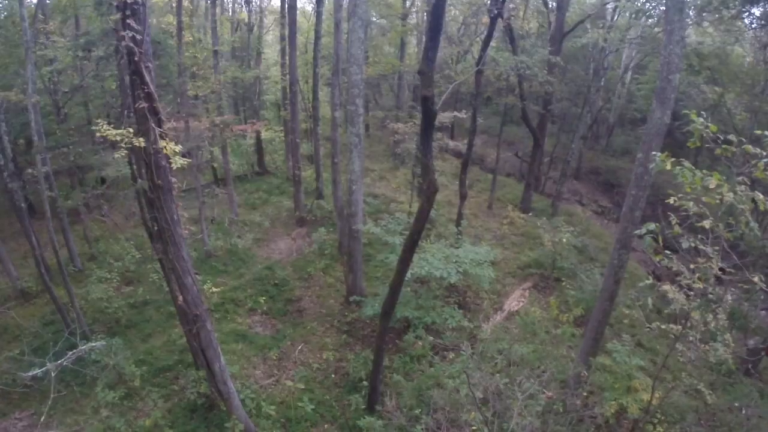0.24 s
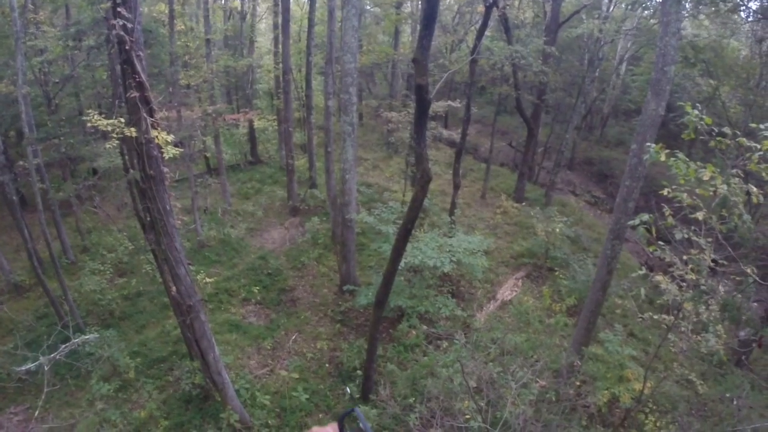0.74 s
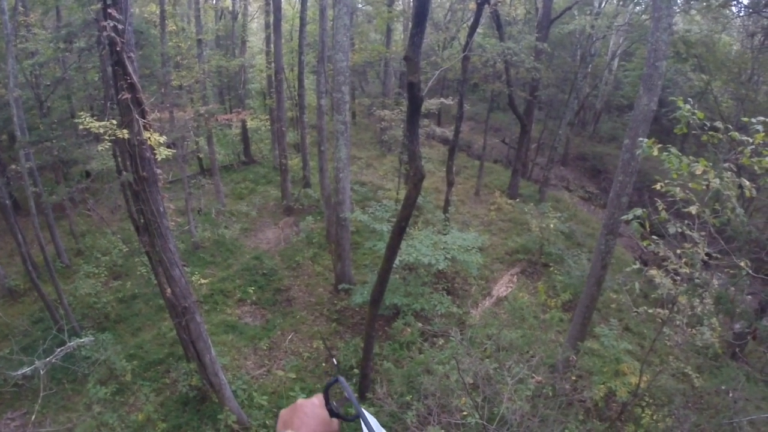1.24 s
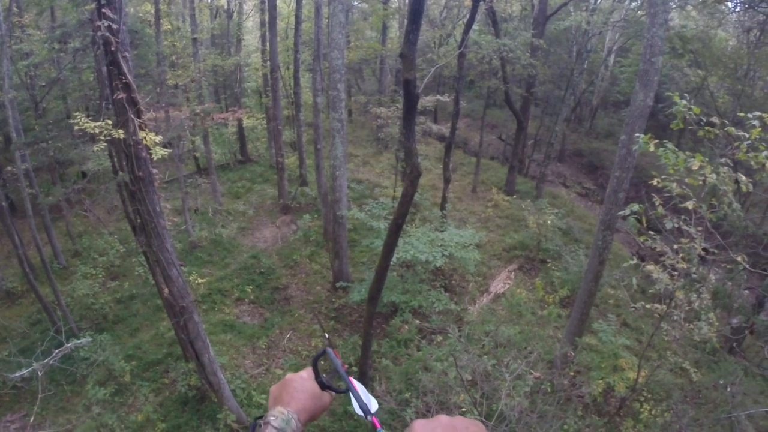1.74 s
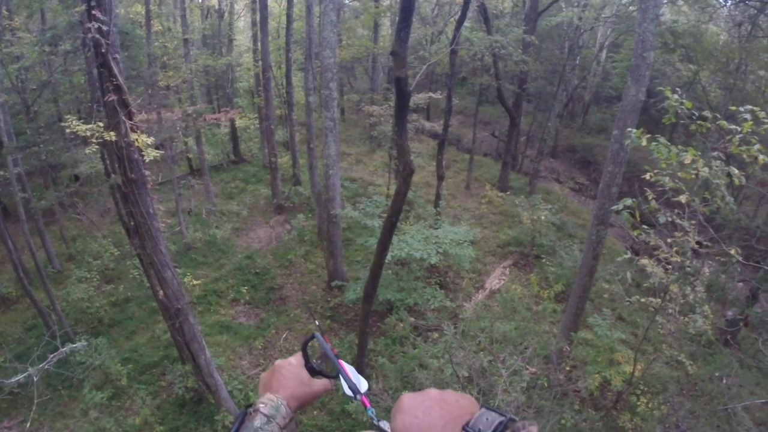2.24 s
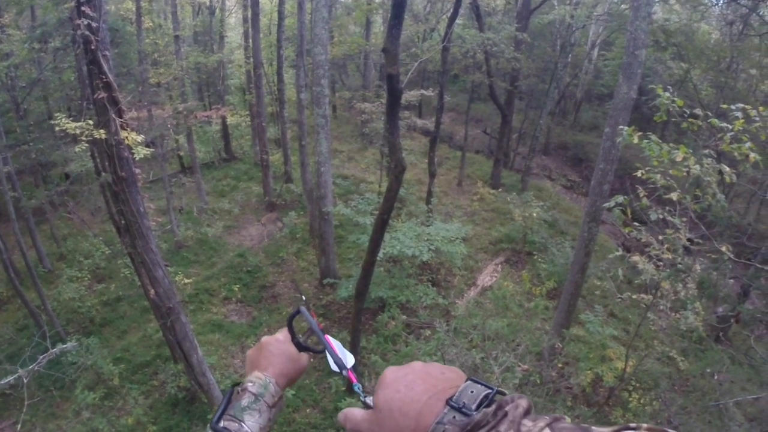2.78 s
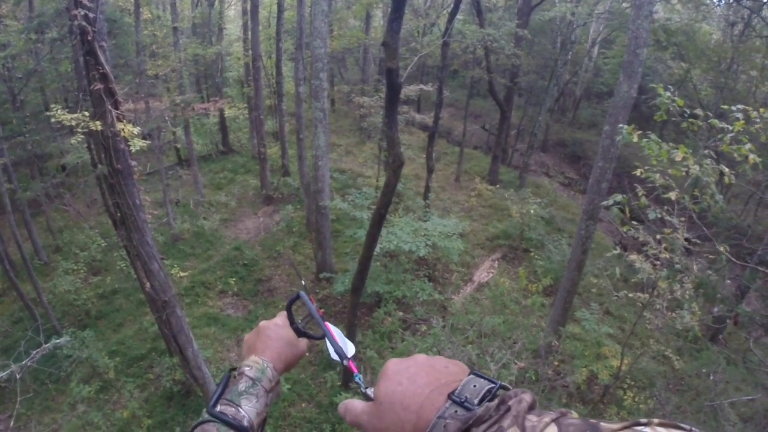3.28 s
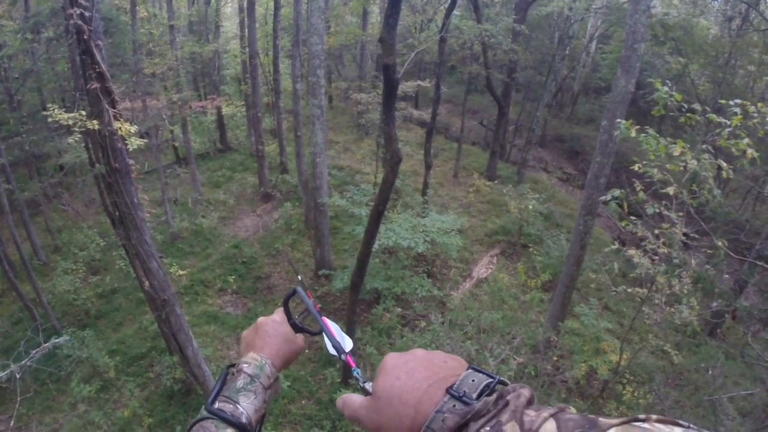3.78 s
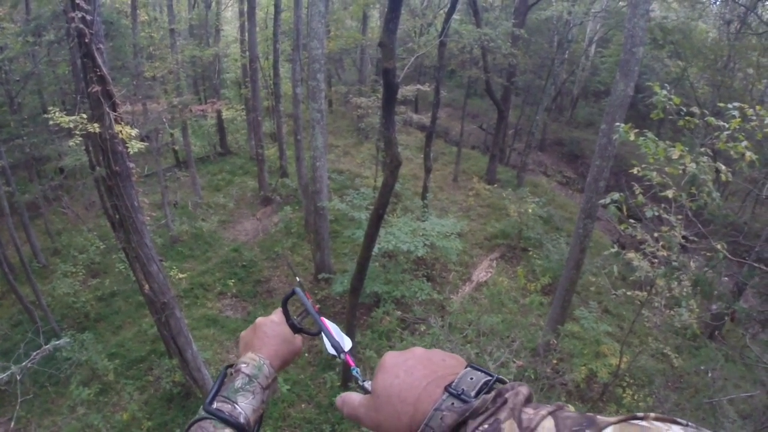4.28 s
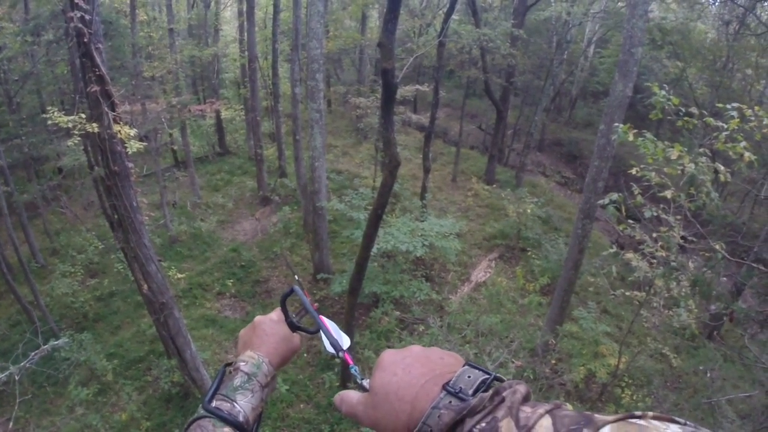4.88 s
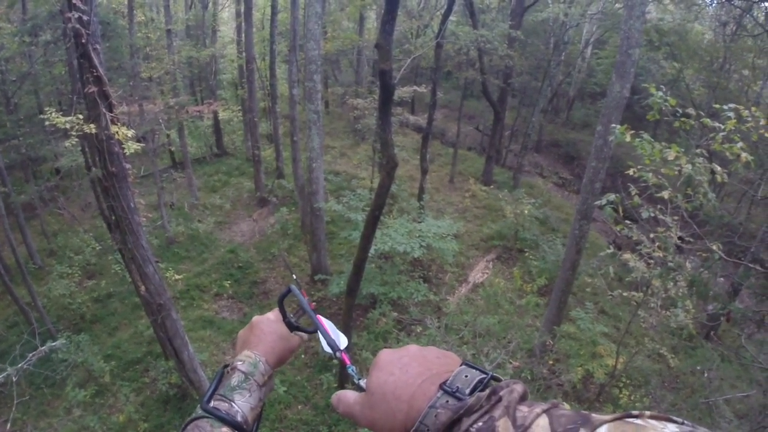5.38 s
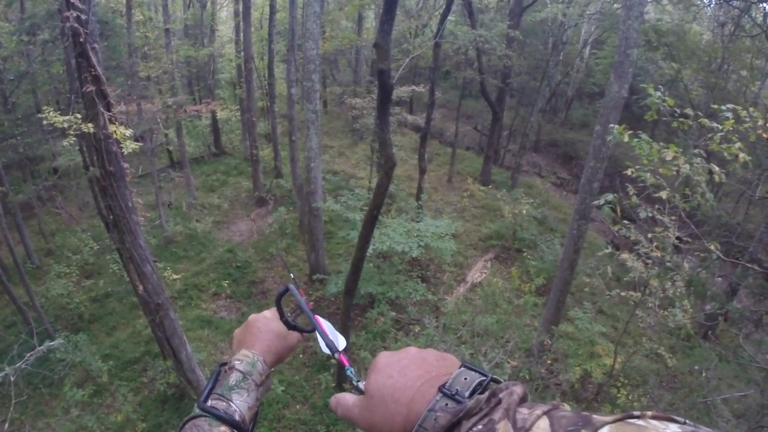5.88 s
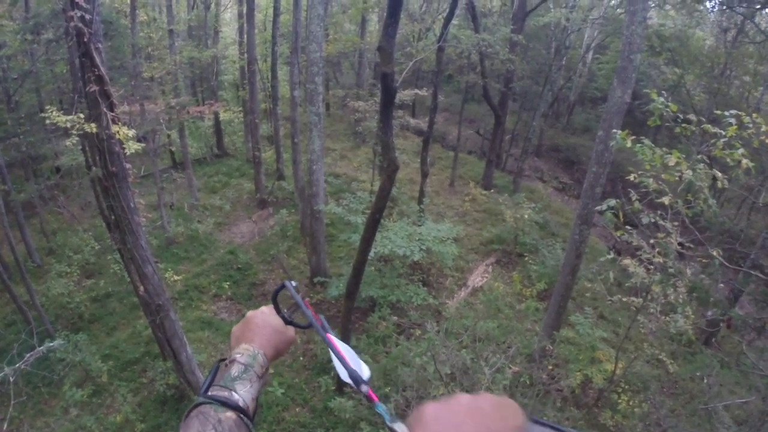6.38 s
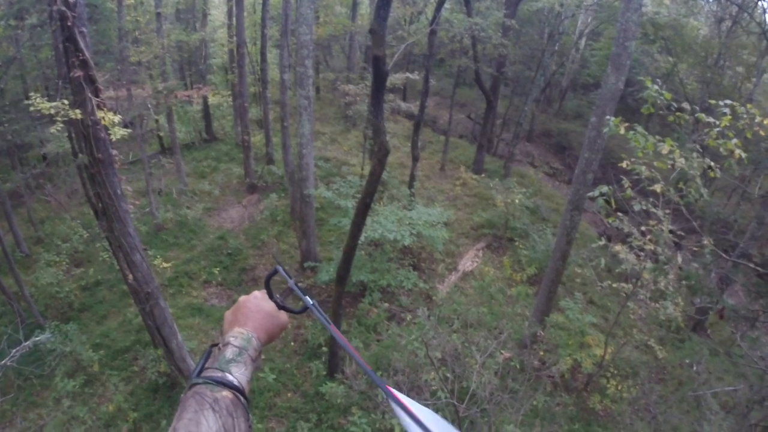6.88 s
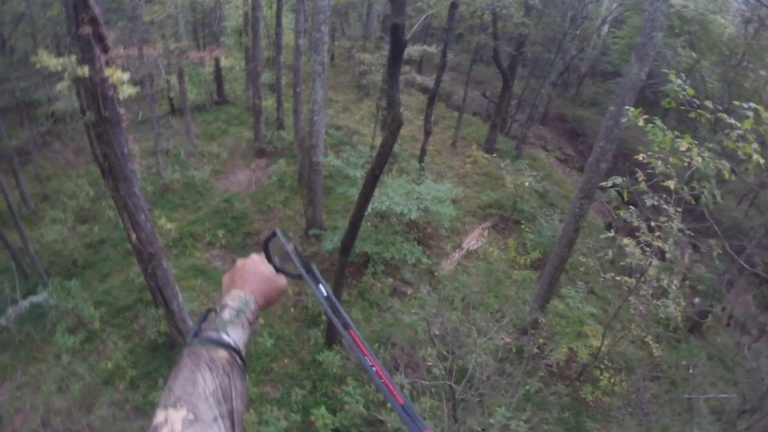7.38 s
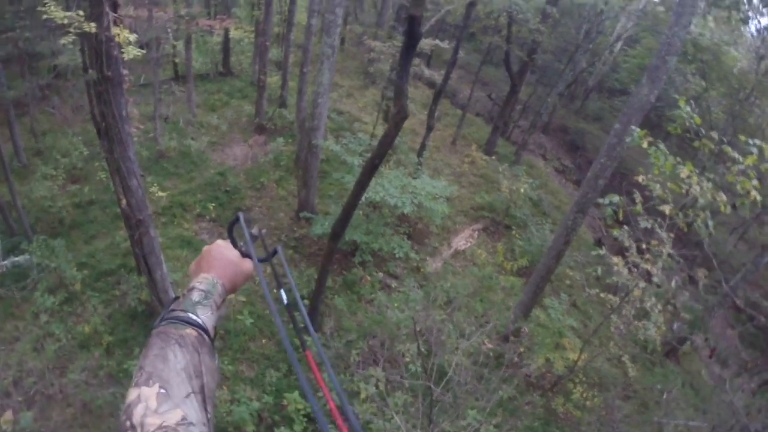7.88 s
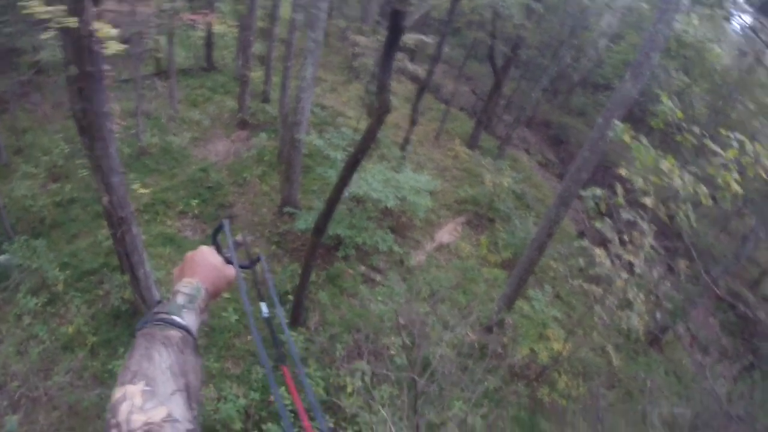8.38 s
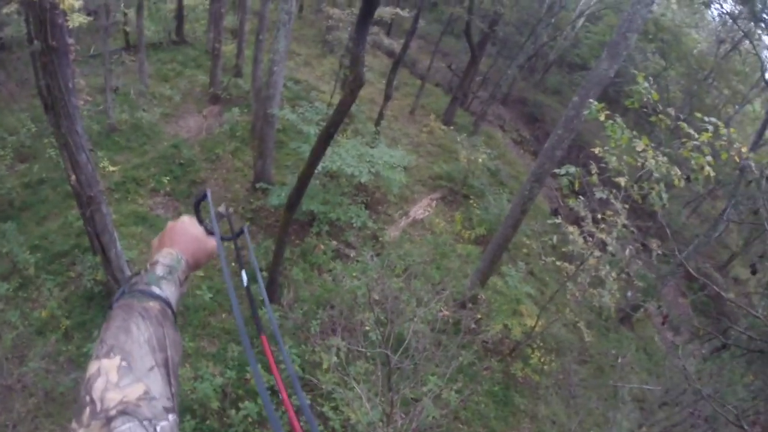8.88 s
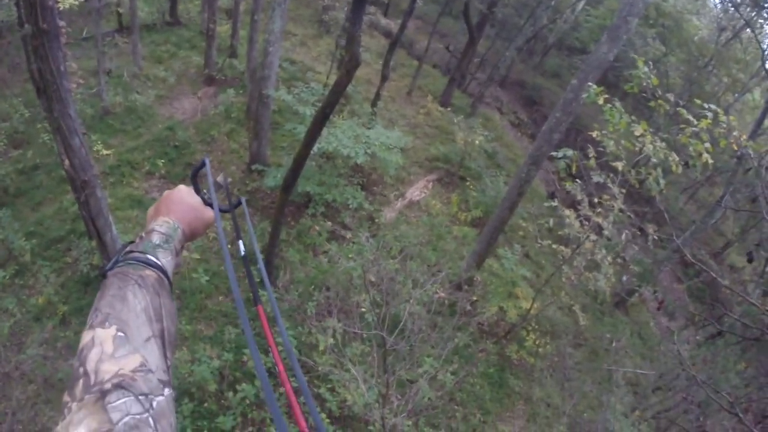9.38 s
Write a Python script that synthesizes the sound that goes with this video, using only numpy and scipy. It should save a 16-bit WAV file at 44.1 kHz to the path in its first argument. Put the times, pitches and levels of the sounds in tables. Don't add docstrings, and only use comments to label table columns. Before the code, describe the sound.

A wide stereo insect chorus, bright and dense, with soft air and a fluttering low hum, lasts only a quarter second. It switches to a much quieter single-channel, head-worn microphone in the woods: dark hiss, short cricket trills, steady chirps, distant trills smeared by trees, and two katydids ticking and buzzing. From about six seconds, low rumble surges as arms strain, with one dull knock at eight.

```python
import sys
import numpy as np
from scipy import signal
from scipy.fft import rfft, irfft
from scipy.io import wavfile
from scipy.ndimage import uniform_filter1d

SR = 44100
rng = np.random.default_rng(int(sys.argv[2]) if len(sys.argv) > 2 else 0)


def gain_from_db(level_db):
    decades = np.asarray(level_db, float) / 20
    return 10 ** decades


def wav_record(signal):
    frames = np.transpose(np.atleast_2d(signal))
    bounded = np.clip(frames, -1, 1)
    quanta = np.round(bounded * 32767).astype(np.int16)
    wavfile.write(sys.argv[1], SR, quanta)


N = 425124


def rms_one(x):
    return x / np.sqrt(np.mean(x ** 2) + 1e-20)


def at_hz(points, n):
    hz = np.maximum(np.arange(n // 2 + 1) * SR / n, 1)
    table_hz, values = np.array(points).T
    return np.interp(np.log(hz), np.log(table_hz), values)


def coloured(spectrum, n):
    white = rfft(rng.standard_normal(n))
    return rms_one(irfft(white * gain_from_db(at_hz(spectrum, n)), n))


def resonate(x, modes):
    out = 0
    for hz, width, db in modes:
        r = np.exp(-np.pi * width / SR)
        poles = [1, -2 * r * np.cos(2 * np.pi * hz / SR), r * r]
        once = signal.lfilter([1], poles, x + 1e-18)
        twice = signal.lfilter([1, 0, -1], poles, once)
        out = out + gain_from_db(db) * rms_one(twice)
    return out


def wing_clicks(n, per_s, spread_db):
    size_db = spread_db * np.minimum(rng.exponential(1, n), 4)
    clicks = gain_from_db(size_db) * rng.choice([-1, 1], n)
    return clicks * (rng.random(n) < per_s / SR)


def add_stroke(out, s, length, hz, db, glide_hz):
    t = np.arange(int(length * SR)) / SR
    pitch = hz + glide_hz * (t / length - .5)
    swell = gain_from_db(db) * np.sin(np.pi * t / length) ** 0.6
    tone = np.sin(2 * np.pi * (rng.random() + np.cumsum(pitch) / SR))
    i = max(int((s - length / 2) * SR), 0)
    out[i:i + len(t)] += (swell * tone)[:len(out) - i]


def low_chorus(n):
    # wing resonance in Hz, width in Hz, level in dB
    low_wings = [(4640, 140, -10), (4826, 360, 0), (5100, 390, 1), (5380, 460, -0.5)]
    singing = gain_from_db(-37) * rms_one(resonate(wing_clicks(n, 8700, spread_db=3.0), low_wings))
    lower_edge = signal.butter(8, 4420, "high", fs=SR, output="sos")
    return signal.sosfilt(lower_edge, singing)


def high_chorus(n):
    # wing resonance in Hz, width in Hz, level in dB
    high_wings = [(6590, 310, -6.5), (6820, 390, 2.5), (7050, 300, 0), (7400, 540, -20)]
    throb_per_s, throb_peak_s, throb_depth = 48.5, .193, .35
    t = np.arange(n) / SR
    throb = 1 + throb_depth * np.cos(2 * np.pi * throb_per_s * (t - throb_peak_s))
    return gain_from_db(-34.5) * rms_one(resonate(wing_clicks(n, 3500, spread_db=2.5), high_wings)) * throb


def low_far_crickets(n):
    return gain_from_db(-56.5) * resonate(wing_clicks(n, 300, spread_db=2.0), [(2990, 300, 0)])


def wide_air(n):
    # frequency in Hz, level in dB per Hz
    air_spectrum = [(20, -38), (60, -9), (200, -3.5), (500, -13.5), (1000, -15), (2500, -19), (4000, -22),
                    (8500, -16.5), (10500, -18.5), (12000, -26), (16000, -26.5)]
    return gain_from_db(-43.5) * coloured(air_spectrum, n)


def motor_hum(n):
    hum_hz, rise_s = 163.2, .06
    beat_s, first_null_s, depth = .09, .045, .55
    t = np.arange(n) / SR
    rise = np.minimum(t / rise_s, 1)
    beat = abs(1 - depth * np.exp(2j * np.pi * (t - first_null_s) / beat_s))
    return gain_from_db(-44.5) * rise * beat * np.sin(2 * np.pi * hum_hz * t)


def wide_microphone(n):
    # frequency in Hz, left-right likeness from -1 to 1
    likeness = [(60, 0.78), (130, 0.99), (290, 0.25), (640, 0.05), (1410, -0.29), (3100, 0.77),
                (6820, 0.95), (15000, 1.0)]
    # frequency in Hz, level in dB
    side_kept = [(20, -8), (5600, 2.5), (5950, -15), (6300, 0), (7600, 1), (8100, -45), (16000, -45)]
    # centre in seconds, length in seconds, pitch in Hz, level in dB
    near_stroke = (.0085, .017, 4945, -26.5)
    alike = np.clip(at_hz(likeness, n), 0, 1)
    mid_share = np.sqrt((1 + alike) / 2)
    side_share = np.sqrt((1 - alike) / 2) * gain_from_db(at_hz(side_kept, n))
    below_top = np.arange(n // 2 + 1) * SR / n < 15750
    pair = []
    for share in (mid_share, side_share):
        wood = low_chorus(n) + high_chorus(n) + low_far_crickets(n) + wide_air(n)
        pair.append(irfft(rfft(wood) * share * below_top, n))
    mid, side = pair
    mid = mid + motor_hum(n)
    add_stroke(mid, *near_stroke, glide_hz=-50)
    return (mid + side * [[1], [-1]]) * gain_from_db([[-.4], [.4]])


def hiss():
    # frequency in Hz, level in dB per Hz
    hiss_spectrum = [(12, -36), (20, 5), (44, 1.5), (129, -1), (1570, -16.5), (4150, -24), (5040, -26),
                     (5950, -26.5), (6840, -27), (8080, -32), (10400, -36), (15300, -38.5)]
    return gain_from_db(-55.5) * coloured(hiss_spectrum, N)


def far_chorus():
    # wing resonance in Hz, width in Hz, level in dB
    far_wings = [(2900, 570, -82), (4870, 320, -78), (5130, 420, -72.5), (5510, 170, -79),
                 (6520, 400, -81.5), (6810, 490, -79), (10240, 760, -87.5)]
    swell_db = 0.33 * rms_one(signal.resample(rng.standard_normal(40), N))
    return gain_from_db(swell_db) * resonate(wing_clicks(N, 4000, spread_db=1.5), far_wings)


def near_trills(out):
    # strokes per second, stroke length in seconds, pitch in Hz, glide in Hz, unevenness
    high_singer = (53.4, .0155, 4965, -80, .7)
    low_singer = (50.3, .013, 4770, 240, 1.5)
    # first stroke in seconds, number of strokes, level in dB
    high_trills = [(.2791, 9, -59), (.8059, 9, -62.5), (1.5893, 10, -58.5), (3.0527, 10, -59),
                   (4.8009, 10, -58), (6.4553, 10, -60.5), (7.6912, 10, -58.5), (9.0406, 10, -60.5)]
    low_trills = [(.9667, 11, -60), (2.5622, 11, -59), (4.218, 9, -62), (6.51, 11, -61), (8.2398, 11, -61)]
    for singer, trills in ((high_singer, high_trills), (low_singer, low_trills)):
        per_s, length, hz, glide_hz, uneven = singer
        for start, strokes, db in trills:
            for k in range(strokes):
                first = k == 0
                stroke_hz = hz - 62 * first + uneven * rng.normal(0, 15)
                stroke_db = db - 1 * first + uneven * rng.normal()
                add_stroke(out, start + k / per_s, length, stroke_hz, stroke_db, glide_hz)


def steady_chirper(out):
    # time in seconds, pitch in Hz, level in dB, share of the limp heard from 0 to 1
    head_turn = [
        (0, 5450, -65.5, 1),
        (3.5, 5455, -65.5, 1),
        (6.1, 5450, -67.5, 1),
        (6.8, 5480, -63, .1),
        (8.6, 5570, -63.5, .1),
        (9.64, 5420, -67, .1),
    ]
    first_s, every_s = .4365, .3127
    limp_s, limp_db, limp_hz = .002, 2.5, 22
    turn_s, *heard = np.transpose(head_turn)
    for k, s in enumerate(np.arange(first_s, N / SR, every_s)):
        hz, db, share = (np.interp(s, turn_s, column) for column in heard)
        limp = share * (-1) ** k
        chirp_hz = hz + limp_hz * limp + rng.normal(0, 15)
        chirp_db = db - limp_db * limp + rng.normal(0, .8)
        add_stroke(out, s + limp_s * limp, .018, chirp_hz, chirp_db, glide_hz=-30)


def low_peeps(out):
    # start in seconds, level in dB, pitch in Hz
    peeps = [
        (0.6015, -61, 3050),
        (5.45, -62, 3050),
        (5.83, -63, 2950),
        (5.89, -63, 2980),
    ]
    for s, db, hz in peeps:
        add_stroke(out, s + 0.014, .018, hz, db - 3, glide_hz=-30)


def far_trills():
    # first stroke in seconds, length in seconds, pitch in Hz, level in dB
    distant_runs = [(.97, .22, 5080, -71), (1.967, 0.21, 4880, -70), (2.5, .12, 5120, -70),
                    (3.267, .24, 5040, -62), (3.68, .1, 5180, -70), (3.892, 0.19, 4960, -65),
                    (4.319, .08, 4910, -63), (4.85, .25, 5300, -69), (5.302, 0.19, 5100, -66),
                    (5.507, 0.22, 5000, -65.5), (5.865, 0.18, 4860, -70), (6.861, 0.21, 4980, -65),
                    (7.14, .42, 4860, -66.5), (7.376, .23, 5120, -64), (7.9, .3, 4750, -69),
                    (8.549, .2, 4750, -69), (8.6, 0.32, 5130, -73), (8.915, .14, 5050, -62.5),
                    (9.27, 0.2, 4970, -64)]
    far = np.zeros(N)
    for start, length, hz, db in distant_runs:
        for s in np.arange(start, start + length, 1 / 52):
            add_stroke(far, s, .015, hz + rng.normal(0, 45), db + rng.normal(0, 1.0), glide_hz=-250)
    leaves = rms_one(signal.resample(rng.standard_normal(3600), N))
    return far * (.9 + .4 * leaves)


def tiny_squeaks(out):
    # centre in seconds, pitch in Hz, level in dB
    squeaks = [
        (2.565, 9400, -69),
        (2.583, 8500, -64),
        (2.625, 8400, -65),
        (2.643, 9700, -66),
    ]
    for s, hz, db in squeaks:
        add_stroke(out, s, .006, hz, db, glide_hz=-500)


def crickets():
    near = np.zeros(N)
    near_trills(near)
    steady_chirper(near)
    low_peeps(near)
    far = far_trills()
    tiny_squeaks(near)
    t = np.arange(int(.12 * SR)) / SR
    echoes = rms_one(rng.standard_normal(len(t)) * gain_from_db(-60 * t / 0.19)) / np.sqrt(len(t))
    to_trees = gain_from_db(-15) * near + gain_from_db(-1) * far
    return near + gain_from_db(-9) * far + signal.fftconvolve(to_trees, echoes)[:N]


def katydids():
    # start in seconds, buzz length in units (2 where the other joins on)
    slow_calls = [(.5294, 2), (.8312, 2), (1.177, 1.4), (1.4756, 1), (1.7818, 2), (2.086, 2), (2.4074, 1),
                  (2.7151, 1), (3.0194, 2), (3.3657, 1), (3.6577, 1), (3.988, 1), (4.2828, 2), (4.5867, 2),
                  (4.9267, 1), (5.2337, 1), (5.5327, 2), (5.8422, 2), (6.181, 1), (6.465, 1), (6.771, 2),
                  (7.0825, 1), (7.4133, 1), (7.7074, 1), (8.0031, 2.5), (8.3464, 1), (8.6375, 1),
                  (8.954, 1), (9.2863, 1), (9.5866, 1)]
    quick_calls = [.2871, 1.0433, 1.2785, 1.5415, 2.2826, 2.4995, 2.535, 2.791, 3.264, 3.5257, 3.7822,
                   4.0707, 4.7951, 5.0397, 5.3062, 6.045, 6.2869, 6.5459, 6.6551, 7.0015, 7.2797, 7.5089,
                   7.8087, 8.2453, 8.5005, 8.766, 9.0317, 9.2044, 9.5201]
    # wing resonance in Hz, width in Hz, level in dB
    buzz_wings = [(10400, 900, -5), (13160, 300, -1), (14200, 800, -2), (14950, 450, -6)]
    unit_s, rasps_per_s = .036, 134
    ticks, rasps = np.zeros(N), np.zeros(N)
    for s, units in slow_calls + [(s, 1) for s in quick_calls]:
        tick_db = -67.5 + 0.38 * s + rng.normal(0, 1.5)
        add_stroke(ticks, s, .003, 9000, tick_db, glide_hz=-2000)
        i = int(s * SR)
        t = np.arange(min(int(units * unit_s * SR), N - i)) / SR
        rasps[i:i + len(t)] = np.exp(-(t * rasps_per_s % 1) / 0.65)
    return ticks + gain_from_db(-87.5) * resonate(rasps * rng.standard_normal(N), buzz_wings)


def drawing_arm():
    # time in seconds, level in dB
    strain = [
        (5.3, -90),
        (5.75, -64),
        (6.72, -57.5),
        (6.82, -51.5),
        (7.3, -48.5),
        (7.95, -42.5),
        (8.4, -49),
        (8.65, -41),
        (9.2, -51),
        (9.64, -48.5),
    ]
    # centre in seconds, level in dB
    surges = [(5.88, 10.5), (6.4, 14), (6.54, 9), (6.86, 6), (7.12, 5), (7.32, 4), (7.41, 7.5), (7.49, 7),
              (7.7, 5), (7.78, 0), (8.28, 9), (8.52, 7.5), (8.87, -0.5), (9.13, 8.5), (9.28, 5),
              (9.53, 6.5)]
    # start in seconds, length in seconds, first pitch in Hz, last pitch in Hz, level in dB
    head_knock = (8.0005, .028, 149, 10, -31.5)
    t = np.arange(N) / SR
    strain_s, strain_db = np.transpose(strain)
    level_db = np.interp(t, strain_s, strain_db)
    for s, db in surges:
        level_db = level_db + db * np.exp(-((t - s) / 0.029) ** 2)
    muscle_spectrum = [(5, -10), (12, -2.5), (25, -1.5), (45, -8.5), (70, -16.5), (120, -32), (20000, -99)]
    shake = coloured(muscle_spectrum, N)
    shake /= np.sqrt(uniform_filter1d(shake ** 2, size=SR // 8) + 0.045)
    start, length, first_hz, last_hz, knock_db = head_knock
    part = np.clip((t - start) / length, 0, 1)
    turns = length * (first_hz * part + (last_hz - first_hz) * part ** 2 / 2)
    knock = gain_from_db(knock_db) * np.sin(np.pi * part ** 1.2) * np.cos(2 * np.pi * turns - 3.0)
    return gain_from_db(level_db) * shake + knock


def thin_treble(x):
    hz, _, frames = signal.stft(x, SR, nperseg=1024)
    power = uniform_filter1d(abs(frames) ** 2, size=5, axis=0)
    patch = uniform_filter1d(power, size=2, axis=1)
    hz = hz[:, None]
    weak = (patch < gain_from_db(2 * -104.5)) & (hz > 12700)
    return signal.istft(frames * ~weak * (hz < 15260), SR, nperseg=1024)[1][:N]


def head_microphone():
    return thin_treble(hiss() + far_chorus() + crickets() + katydids() + drawing_arm())


def scene():
    change_s, fade_s = 0.256, 0.013
    fade = np.clip((np.arange(N) / SR - change_s) / fade_s + .5, 0, 1)
    out = np.tile(fade * head_microphone(), (2, 1))
    n = 13230
    out[:, :n] += (1 - fade[:n]) * wide_microphone(n)
    return out


def roll_off(x):
    return signal.sosfilt(signal.butter(12, 16190, fs=SR, output="sos"), x)


def record(dry):
    return roll_off(dry)


dry = scene()
out = record(dry)
wav_record(out)
```